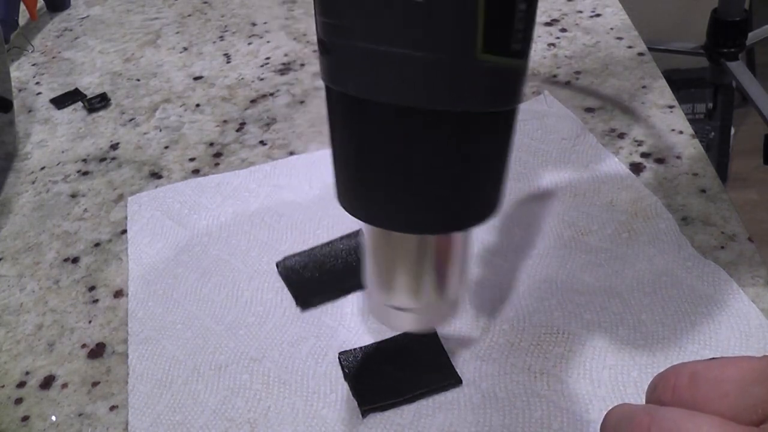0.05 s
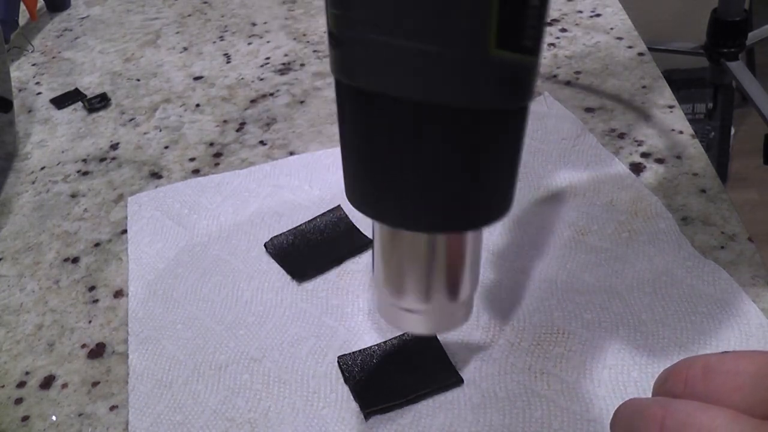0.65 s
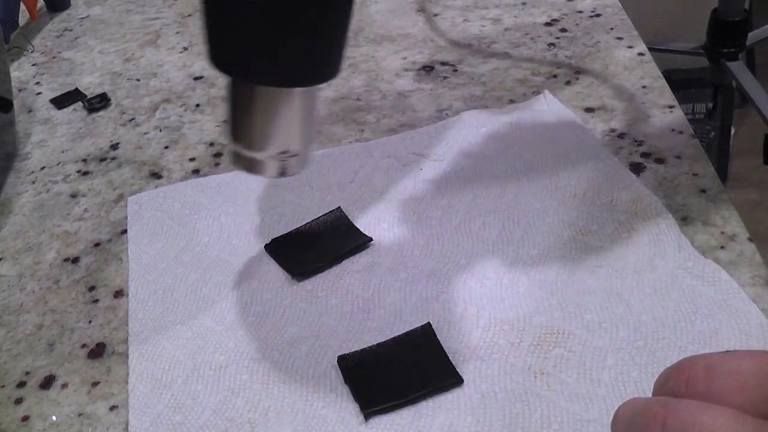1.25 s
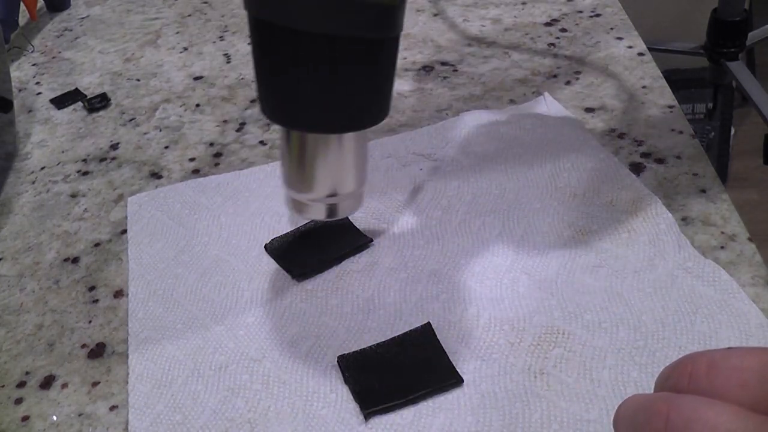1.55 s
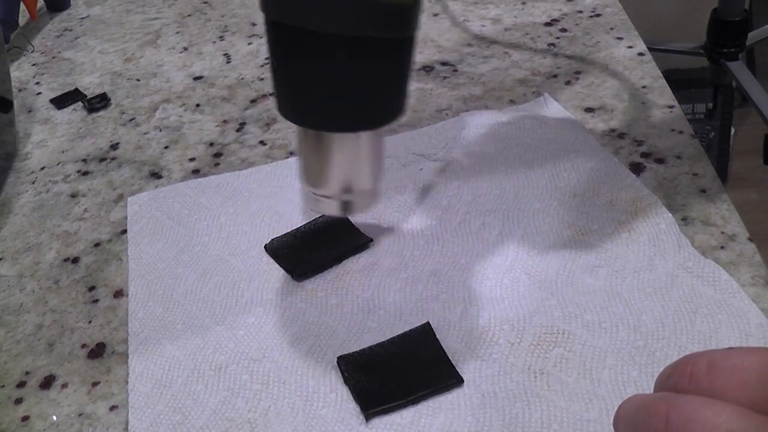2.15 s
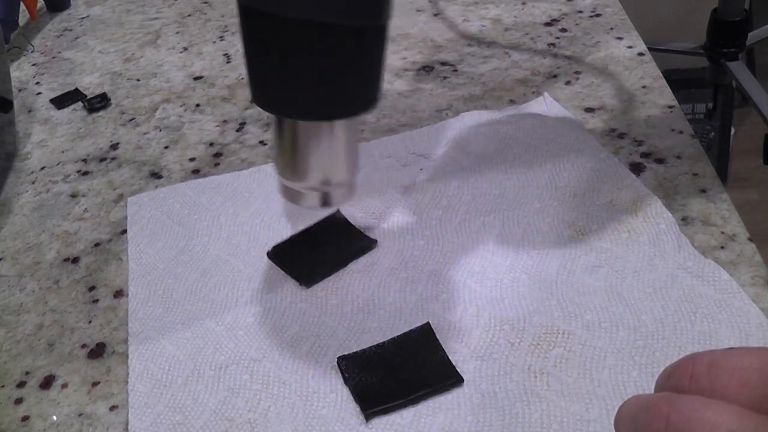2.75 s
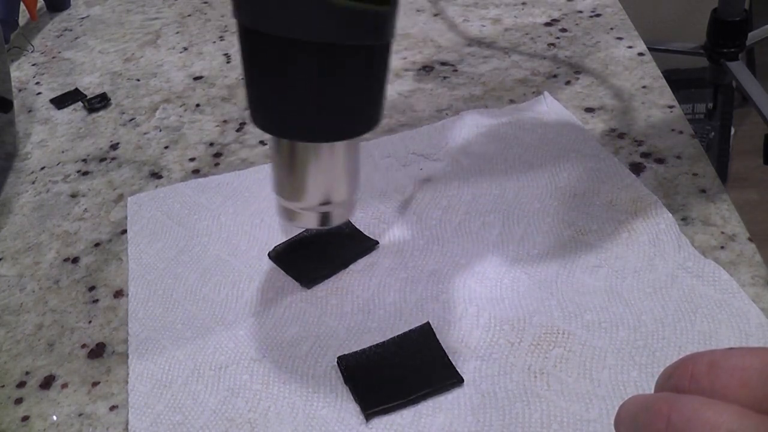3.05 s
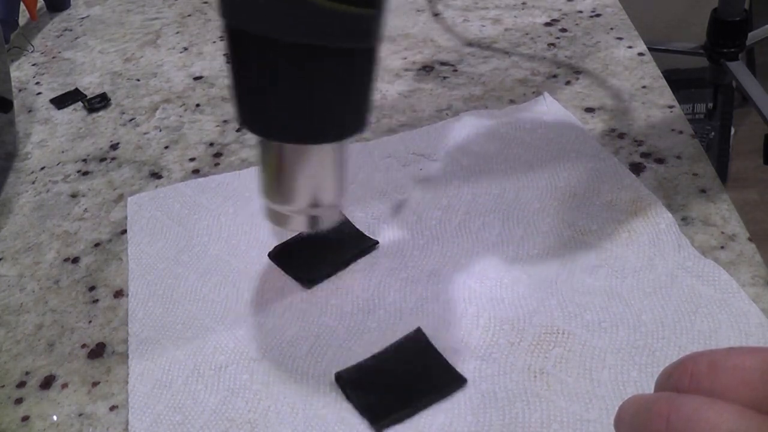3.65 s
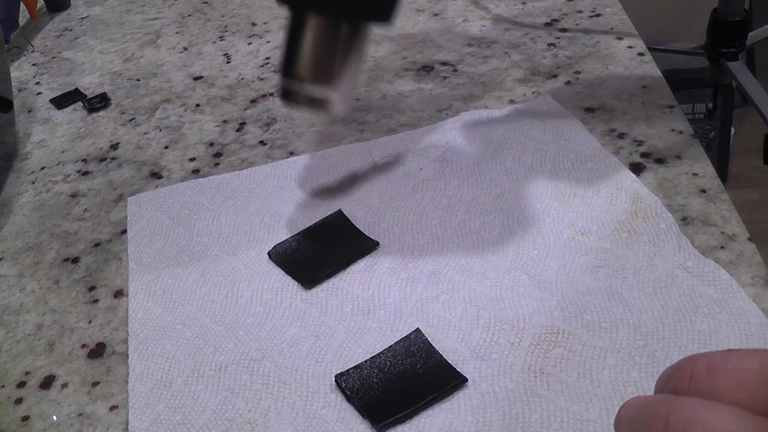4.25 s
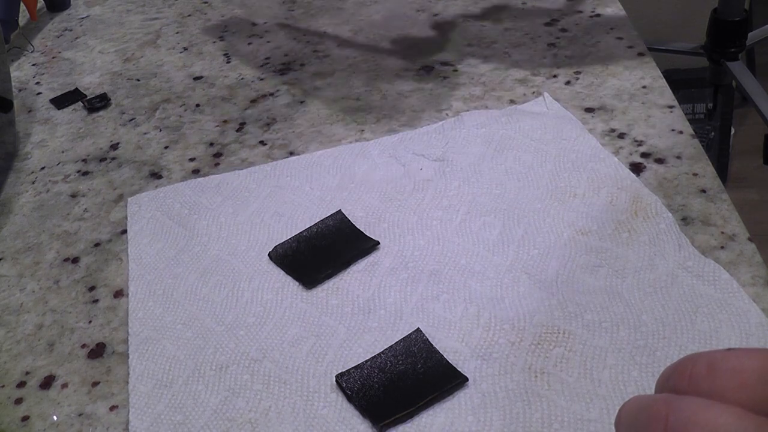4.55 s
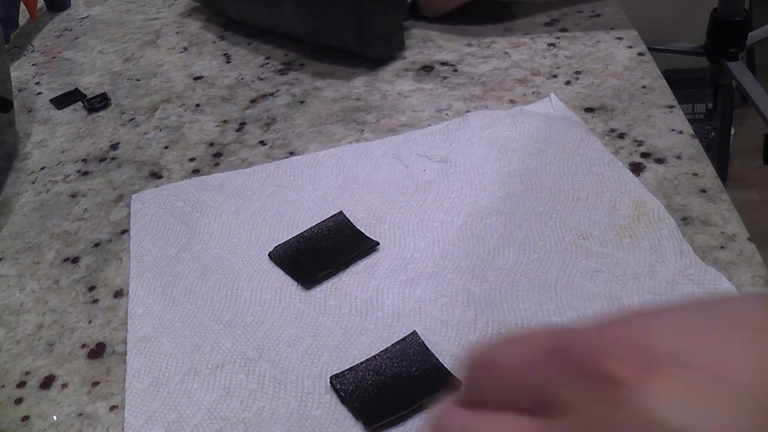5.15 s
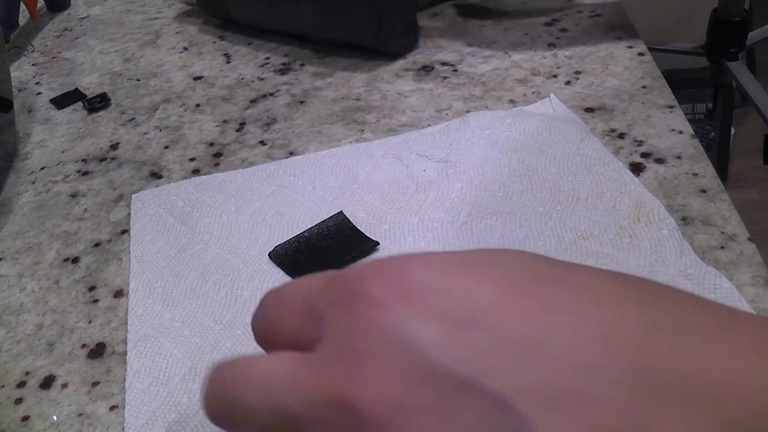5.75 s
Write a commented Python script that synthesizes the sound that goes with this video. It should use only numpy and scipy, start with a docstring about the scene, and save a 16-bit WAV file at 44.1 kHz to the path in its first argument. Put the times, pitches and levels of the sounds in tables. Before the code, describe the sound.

Steady rushing air and motor whine from a heat gun, then a switch click, a slowing fan and a knock as it is set down.

```python
"""A heat gun blows over scraps on a stone kitchen counter: its turbulent jet rings in the barrel and
the gap below, howls on dips and hisses on paper, over the hum and whine of the motor.
The switch snaps off; the fan coasts down with brush chatter and a sinking commutator whistle.
The gun lands on the counter, judders and tips onto its side.
Fingers then pick a scrap off a paper towel. The handling sounds echo in the quiet kitchen."""
import sys
import numpy as np
from scipy import signal
from scipy.fft import rfft, irfft
from scipy.io import wavfile

SR = 44100
rng = np.random.default_rng(int(sys.argv[2]) if len(sys.argv) > 2 else 0)


def inscribe(sig):
    """Save sig as 16-bit PCM at rate SR to the path in sys.argv[1].

    A 1-D sig is mono; a 2-D sig holds one channel per row.
    Samples are clipped to [-1, 1] before scaling.
    """
    pcm = np.round(np.clip(np.atleast_2d(sig).T, -1, 1) * 32767)
    wavfile.write(sys.argv[1], SR, pcm.astype(np.int16))


N = 264600
TIME_S = np.arange(N) / SR
BINS_HZ = np.maximum(np.arange(N // 2 + 1) * SR / N, 1)
RUN_RPS, POWER_OFF_S = 255.7, 4.11

# Room noise and hiss. Each row: frequency in Hz, relative density in dB.
FLOOR_SPECTRUM = [(30, -30), (70, -26), (120, -11), (190, 3.5), (450, 0), (800, -2.5), (1300, 1),
                  (3000, -8), (8000, -9), (16000, -9)]
# Kitchen reverb colour. Each row: frequency in Hz, gain in dB.
ROOM_GAINS = [(100, 13.5), (300, -4.5), (900, -8), (2000, -1.5), (5000, -9), (12000, -9)]
# Kitchen reverb decay. Each row: frequency in Hz, T60 in seconds.
ROOM_DECAY = [(150, 0.33), (2000, 0.36), (6000, 0.4), (14000, 0.33)]

# Fingers sliding on the towel. Each row: time in seconds, level in dB.
SLIDE_LEVELS = [(5.6, -59), (5.62, -43), (5.64, -44), (5.665, -48), (5.7, -70), (5.78, -84)]
# Fingernail on paper. Each row: start in seconds, force in dB.
NAIL_HITS = [(5.6072, -29), (5.624, -35), (5.6445, -34), (5.6595, -21.5), (5.663, -18.5)]
# Paper towel modes. Each row: frequency in Hz, gain in dB, T60 in seconds.
PAPER_MODES = [(3600, -5, 0.0029), (4500, -5, 0.0027), (5850, -5.5, 0.0058), (7140, -8, 0.0033),
               (8500, -5.5, 0.0027), (10900, -27, 0.0017)]
# Scrap tapping the counter. Each row: start in seconds, force in dB.
SCRAP_HITS = [(5.6812, -44), (5.6895, -22), (5.7425, -43), (5.7555, -48)]
# Scrap modes. Each row: frequency in Hz, gain in dB, T60 in seconds.
SCRAP_MODES = [(815, -10.5, 0.029), (1250, -12, 0.004), (3520, -1, 0.0023), (4550, -5.5, 0.011)]

# Gun foot landing, heel then sole. Each row: start in seconds, force in dB.
FOOT_HITS = [(4.9963, -8), (4.9978, -17)]
# Foot modes. Each row: frequency in Hz, gain in dB, T60 in seconds.
FOOT_MODES = [(1210, -34, 0.0062), (2140, -5.5, 0.0081), (2490, -34, 0.22), (2510, -5.5, 0.01),
              (4330, -8.5, 0.017), (5040, -4, 0.0095), (7150, -6, 0.0055), (8300, -9.5, .005),
              (10200, -6.5, 0.003), (12100, -11, 0.0025)]
# Barrel tipping onto stone, rim then flank. Each row: start in seconds, force in dB.
BARREL_HITS = [(5.3035, -23), (5.3055, -11.5)]
# Struck barrel modes. Each row: frequency in Hz, gain in dB, T60 in seconds.
BARREL_MODES = [(1010, -6.5, 0.022), (1690, -7.5, 0.035), (1800, -10.5, 0.024), (2045, -7, 0.017),
                (2780, -13.5, 0.02), (4380, -9, 0.0028), (6900, -24, 0.0055)]
# Gun rocking on the counter. Each row: start in seconds, force in dB, first gap in seconds,
# ratio of successive gaps, loss per touch in dB.
ROCKING_RUNS = [(4.998, -21.5, 0.036, .8, 8.5), (5.105, -30, .033, .9, 6), (5.323, -21.5, .013, .95, 13)]
# Counter modes. Each row: frequency in Hz, gain in dB, T60 in seconds.
COUNTER_MODES = [(119.3, -35, 0.087), (185, -12, 0.031), (243, -12, 0.053), (320, -3.5, 0.028),
                 (494, -3.5, 0.022), (805, -23, 0.042)]
# Switch snap. Each row: start in seconds, force in dB.
SWITCH_HITS = [(4.1168, -15), (4.1185, -11)]
# Switch modes. Each row: frequency in Hz, gain in dB, T60 in seconds.
SWITCH_MODES = [(1250, -12, .02), (3050, -5, .012), (3700, -5, .011), (4300, -6, .009), (5900, -11, .006),
                (7600, -12, .006), (10600, -9, .006), (12800, -19, .005)]

# Speeds that shake the housing. Each row: centre and width in turns per second, boost in dB.
SHAKE_SPEEDS = [(207, 36, 9.5), (162.8, 12.4, 9.5)]
# Housing response to brush ticks. Each row: frequency in Hz, relative gain in dB.
HOUSING_SPECTRUM = [(150, -38), (1000, -22), (2200, 1), (3100, -2.5), (4300, 3), (6000, 6.5), (7000, -1.5),
                    (9500, -0.5), (10800, -10), (13500, -7), (15000, -2), (16000, -14)]
# Sharp housing resonances. Each row: frequency in Hz, width in Hz, gain in dB.
HOUSING_PEAKS = [(2750, 150, -5), (3550, 400, 1), (5620, 350, 4), (6400, 300, 1), (7550, 200, 0),
                 (8680, 300, -1), (9400, 200, -5), (14900, 600, -7)]
# Fan swirl at full speed. Each row: frequency in Hz, relative density in dB.
FAN_SPECTRUM = [(100, -45), (250, -10.5), (500, -11.5), (750, -4), (1020, 5), (1300, -0.5), (1900, -5.5),
                (2550, 2), (3200, -22), (8000, -42)]
# Vents swinging past. Each row: middle in seconds, length in seconds, added swirl in relative dB.
VENT_PASSES = [(4.27, 0.086, 3.5)]
# Motor tones. Each row: multiple of the turn rate, base levels in dB over the near and far scrap.
MOTOR_TONES = [(1, -56.5, -59), (2, -62, -63), (3, -51, -53), (6, -48, -53), (10, -52, -52), (12, -45, -53),
               (13, -55, -68), (14, -57, -56), (16, -56, -49), (17, -57, -51), (18, -60, -44),
               (19, -60, -60), (20, -57, -54), (21, -53, -54), (22, -59, -59), (25, -66, -65),
               (30, -61, -63), (32, -65, -65), (35, -62, -61), (36, -53, -58.5), (37, -61, -66),
               (38, -72, -68), (40, -61, -74), (45, -69, -76), (51, -74, -72), (53, -67, -82),
               (55, -74, -74), (57, -60, -61), (59, -70, -70), (60, -59, -55), (61, -62, -70)]

# Nozzle aim. Each row: time in seconds, position from 0 (near scrap) to 1 (far scrap).
AIM_PATH = [(0, 0), (1.0, 0), (1.28, .25), (1.42, 1), (3.5, 1), (3.8, .8), (4.05, 1), (4.3, .7)]
# Jet turbulence. Each row: frequency in Hz, relative density in dB.
JET_SPECTRUM = [(40, -73), (90, -40), (170, -40), (280, -21.5), (600, -10), (900, -10), (1500, -8),
                (3300, -12.5), (5000, -20), (7500, -25), (10000, -34), (14000, -38), (16000, -38)]
# Barrel and gap resonances, near scrap. Each row: frequency in Hz, width in Hz, gain in dB.
NEAR_GAP_PEAKS = [(1182, 380, 15), (1500, 350, -4), (1903, 330, 6), (2320, 100, -28), (2950, 580, 4.5),
                  (3370, 490, -2.5), (4030, 510, 10), (5240, 370, -16), (6070, 270, 0), (7420, 160, 6.5),
                  (7940, 430, -25)]
# Barrel and gap resonances, far scrap. Each row: frequency in Hz, width in Hz, gain in dB.
FAR_GAP_PEAKS = [(1067, 200, 9.5), (1266, 226, 17.5), (1660, 300, 1.5), (2300, 110, 2.5),
                 (3066, 130, -12.5), (3710, 340, 4), (4433, 510, 12), (4970, 210, -12), (5710, 930, 6),
                 (7140, 320, -8), (7480, 580, 6.5)]
# Nozzle dipping onto a scrap. Each row: middle in seconds, length in seconds, howl gain in dB.
NOZZLE_DIPS = [(.47, 1.21, -31), (1.67, 0.2, -33), (2.14, 0.24, -32), (2.58, 0.6, -39), (3.22, 0.29, -33.5),
               (3.78, 0.29, -32.5)]
# Howl overtones in the barrel. Each row: frequency in Hz, width in Hz, gain in dB.
HOWL_PEAKS = [(1762, 580, 27), (2737, 910, 27)]
# Jet crossing bare paper. Each row: middle in seconds, length in seconds, hiss gain in dB.
PAPER_SWEEPS = [(.35, .9, -45), (1.23, 0.21, -39), (4.15, 0.21, -41)]
# Jet hiss on paper. Each row: frequency in Hz, relative density in dB.
HISS_SPECTRUM = [(2000, -42), (4500, -1.5), (6000, 9.5), (7000, -5), (8500, -1.5), (11000, -12),
                 (16000, -11)]


def from_db(db):
    """Decibels to gain."""
    return 10 ** (np.asarray(db) / 20)


def unit_rms(x):
    """Scale to rms 1."""
    return x / np.sqrt(np.mean(x ** 2) + 1e-20)


def at_samples(rows):
    """Control curve at every sample."""
    return np.interp(TIME_S, *np.transpose(rows))


def at_hz(rows, hz):
    """Interpolate on a log-frequency axis."""
    row_hz, values = np.transpose(rows)
    return np.interp(np.log(hz), np.log(row_hz), values)


def bell(x, centre, width):
    """Gaussian of height 1; full width at half height."""
    return .5 ** ((2 * (x - centre) / width) ** 2)


def drift(rate_hz, hop=40, settle=2000):
    """Smooth random curve, rms about 1."""
    pole = np.exp(-2 * np.pi * hop * rate_hz / SR)
    noise = rng.standard_normal(N // hop + settle + 2)
    slow = signal.lfilter([1], [1, -2 * pole, pole * pole], noise)[settle:]
    return np.interp(np.arange(N) / hop, np.arange(len(slow)), unit_rms(slow))


def ramp(start_s, length_s):
    """Linear rise from 0 to 1."""
    return np.clip((TIME_S - start_s) / length_s, 0, 1)


def swells(rows, edge_s):
    """Gain of soft-edged passes."""
    return sum(from_db(db) * .5 * (1 + np.tanh((length_s / 2 - np.abs(TIME_S - middle_s)) / (2 * edge_s)))
               for middle_s, length_s, db in rows)


def colour(x, spectrum, peaks=()):
    """Filter by a broad spectrum plus peaks and notches; rms 1."""
    db = at_hz(spectrum, BINS_HZ)
    for hz, width_hz, gain_db in peaks:
        db = db + gain_db * bell(BINS_HZ, hz, width_hz)
    return unit_rms(irfft(rfft(x) * from_db(db), N))


def shaped_noise(spectrum, peaks=()):
    """Coloured noise, rms 1."""
    return colour(rng.standard_normal(N), spectrum, peaks)


def ring(force, modes):
    """Damped modes of alternating sign; slow pushes radiate nothing."""
    out = 0
    for k, (hz, db, t60_s) in enumerate(modes):
        radius = from_db(-60 / (t60_s * SR))
        poles = [1, -2 * radius * np.cos(2 * np.pi * hz / SR), radius * radius]
        out += (-1) ** k * from_db(db) * signal.lfilter([.5, 0, -.5], poles, force + 1e-18)
    return out


def strike(hits, modes, crunch, crunch_s):
    """Each hit, a click plus decaying micro-contacts, rings the modes."""
    force, age_s = np.zeros(N), TIME_S[:SR // 20]
    for start_s, db in hits:
        contact = crunch * rng.standard_normal(len(age_s)) * np.exp(-age_s / crunch_s)
        contact[0] = 1
        at = round(start_s * SR)
        force[at:at + len(age_s)] += from_db(db) * contact
    return ring(force, modes)


def bounces(start_s, db, gap_s, ratio, loss_db):
    """Four hits of a settling object, ever weaker and quicker."""
    return [(start_s + gap_s * sum(ratio ** j for j in range(k)), db - loss_db * k) for k in range(4)]


def background(floor_db=-53, tone_db=-68.5, tone_hz=12023):
    """Room noise, hiss and a thin electronic tone."""
    tone = np.sqrt(2) * from_db(tone_db) * np.sin(2 * np.pi * tone_hz * TIME_S)
    return from_db(floor_db) * shaped_noise(FLOOR_SPECTRUM) + tone


def kitchen_reverb(x, predelay_s=.006, bands=9):
    """Diffuse reflections, one decay time per band."""
    age_s, response = TIME_S[:SR // 2], 0
    edges_hz = np.geomspace(70, 17000, bands + 1)
    for low_hz, high_hz in zip(edges_hz, edges_hz[1:]):
        hz = np.sqrt(low_hz * high_hz)
        decay = from_db(-60 * age_s / at_hz(ROOM_DECAY, hz)) * (age_s > predelay_s)
        echoes = rng.standard_normal(len(age_s)) * decay / np.linalg.norm(decay)
        band = signal.butter(2, [low_hz, high_hz], "band", fs=SR, output="sos")
        response += from_db(at_hz(ROOM_GAINS, hz)) * signal.sosfilt(band, echoes)
    return signal.fftconvolve(x, response)[:N]


def fingers(snags_per_s=5000):
    """A nail ticks on paper, the scrap taps, fibres snag and release."""
    nail = strike(NAIL_HITS, PAPER_MODES, crunch=.18, crunch_s=.0016)
    scrap = strike(SCRAP_HITS, SCRAP_MODES, crunch=.12, crunch_s=.001)
    snags = rng.standard_normal(N) * (rng.random(N) < snags_per_s / SR)
    rustle = from_db(at_samples(SLIDE_LEVELS)) * unit_rms(ring(snags, PAPER_MODES))
    return nail + scrap + rustle


def set_down():
    """The foot lands, the barrel tips over, the counter thuds under the rocking weight."""
    judder = bounces(start_s=5.0795, db=-24, gap_s=.03, ratio=.67, loss_db=1.8)
    rebound = bounces(start_s=5.3165, db=-22.5, gap_s=.0135, ratio=.5, loss_db=9)
    rocking = [hit for run in ROCKING_RUNS for hit in bounces(*run)]
    foot = strike(FOOT_HITS + judder, FOOT_MODES, crunch=.077, crunch_s=.0017)
    barrel = strike(BARREL_HITS + rebound, BARREL_MODES, crunch=.082, crunch_s=.0028)
    counter = strike(rocking, COUNTER_MODES, crunch=.056, crunch_s=.008)
    return foot + barrel + counter


def switch():
    """The switch snaps off and rings briefly."""
    return strike(SWITCH_HITS, SWITCH_MODES, crunch=.1, crunch_s=.0011)


def lifted():
    """0 to 1 as the gun lifts off the work."""
    return ramp(start_s=4.08, length_s=.09)


def aside():
    """0 to 1 as the gun swings aside."""
    return ramp(start_s=4.47, length_s=.077)


def coasting():
    """0 under power, 1 once the rotor runs free."""
    return ramp(POWER_OFF_S, length_s=.083)


def rotor_rps(sag_rps_per_s=.27, friction_rps_per_s=76, drag_per_turn=.0042):
    """Speed sags under power, then bearing friction and air drag brake it."""
    powered_rps = RUN_RPS - sag_rps_per_s * np.minimum(TIME_S, POWER_OFF_S)
    off_s = np.maximum(TIME_S - POWER_OFF_S, 0)
    knee_rps = np.sqrt(friction_rps_per_s / drag_per_turn)  # drag equals friction here
    rps = knee_rps * np.tan(np.arctan(powered_rps / knee_rps) - drag_per_turn * knee_rps * off_s)
    return np.maximum(rps, 1)


def shake_db(rps):
    """Boost at speeds where the rotor shakes the housing."""
    return sum(db * bell(rps, centre_rps, width_rps) for centre_rps, width_rps, db in SHAKE_SPEEDS)


def commutator(rps, turns, segments=5, overtones=20, base_db=-51.5, aside_db=-4, rough_db=5.5):
    """Coasting whistle: overtones of the segment rate chirp through housing resonances."""
    grid_hz, whistle = np.arange(0, SR // 2, 10), 0
    response = np.sqrt(sum(from_db(db) ** 2 / (1 + (2 * (grid_hz - hz) / width_hz) ** 2) ** 2
                           for hz, width_hz, db in HOUSING_PEAKS))
    for k in segments * np.arange(1, overtones + 1):
        gain = np.interp(k * rps, grid_hz, response, right=0) * from_db(rough_db * drift(40))
        whistle += gain * np.sin(2 * np.pi * (k * turns + rng.random()))
    db = base_db + aside_db * aside() + shake_db(rps)
    return coasting() * from_db(db) * (rps / RUN_RPS) ** .95 * whistle


def brushes(rps, turns, spots=30, jitter_turns=.0018, base_db=-53, coast_db=8, aside_db=-2):
    """The same rough spots tick past the brushes each turn; the housing radiates them."""
    spot_turns, sizes = rng.random(spots), rng.standard_normal(spots)
    tick_turns = np.arange(int(turns[-1]))[:, None] + spot_turns
    tick_turns += jitter_turns * rng.standard_normal(tick_turns.shape)
    at = np.interp(tick_turns, turns, np.arange(N)).ravel()
    force = (sizes * (1 + .35 * rng.standard_normal(tick_turns.shape))).ravel()
    whole, part = at.astype(int), at % 1  # split each tick over two samples
    ticks = np.bincount(whole, force * (1 - part), N + 1) + np.bincount(whole + 1, force * part, N + 1)
    db = base_db + coast_db * coasting() + aside_db * aside() + .41 * shake_db(rps)
    return from_db(db) * (rps / RUN_RPS) ** .38 * colour(ticks[:N], HOUSING_SPECTRUM)


def fan(rps, turns, base_db=-45, lifted_db=5, aside_db=-6.5):
    """Blade eddies sink in pitch and level with the speed."""
    eddies = np.interp(turns / RUN_RPS, TIME_S, shaped_noise(FAN_SPECTRUM))
    db = base_db + lifted_db * lifted() + aside_db * aside()
    vent_gain = 1 + swells(VENT_PASSES, edge_s=.022)
    return from_db(db) * vent_gain * (rps / RUN_RPS) ** 1.84 * eddies


def motor_whine(turns, trim_db=.62, waver_db=3, whine_release_s=.021, hum_release_s=.26):
    """Turn-rate harmonics waver as the gun moves; they die with the current, the rotor hum later."""
    off_s = np.maximum(TIME_S - POWER_OFF_S, 0)
    far, out = at_samples(AIM_PATH), 0
    for k, near_db, far_db in MOTOR_TONES:
        depth, release_s = (1, hum_release_s) if k == 1 else ((k / 20) ** .25, whine_release_s)
        db = trim_db + near_db + (far_db - near_db) * far + depth * waver_db * drift(6.3)
        amplitude = np.sqrt(2) * from_db(db) * np.exp(-off_s / release_s)
        out += amplitude * np.sin(2 * np.pi * (k * turns + rng.random()))
    return out


def stone_echo(x, mean_lag_s=.001066, sway=.073, gain=.3):
    """Reflection off the counter; the waving hand shifts its delay."""
    lag_s = mean_lag_s * (1 + sway * drift(4))
    return gain * np.interp(TIME_S - lag_s, TIME_S, x)


def air_jet(rps, base_db=-26.3, far_db=-.38, lifted_db=-6, aside_db=-7.5,
            hover_howl_db=-40, dip_rush_db=-11, dip_hiss_db=-20.5, flutter_db=.55):
    """Turbulence follows fan speed and rings in barrel and gap; dips add howl, rush and hiss."""
    far, dips = at_samples(AIM_PATH), swells(NOZZLE_DIPS, edge_s=.035)
    rush_gain = from_db(base_db + far_db * far + lifted_db * lifted()) + from_db(dip_rush_db) * dips
    howl_gain = np.hypot(from_db(hover_howl_db), dips)
    hiss_gain = swells(PAPER_SWEEPS, edge_s=.02) + from_db(dip_hiss_db) * dips
    near_rush = np.sqrt(1 - far) * shaped_noise(JET_SPECTRUM, NEAR_GAP_PEAKS)
    far_rush = np.sqrt(far) * shaped_noise(JET_SPECTRUM, FAR_GAP_PEAKS)
    howl = howl_gain * shaped_noise(JET_SPECTRUM, HOWL_PEAKS)
    hiss = hiss_gain * shaped_noise(HISS_SPECTRUM)
    direct = rush_gain * (near_rush + far_rush) + howl + hiss
    flow_gain = (rps / RUN_RPS) ** 2.26 * from_db(aside_db * aside())
    return flow_gain * (direct + stone_echo(direct)) * from_db(flutter_db * drift(22))


def scene(wobble=.0003):
    """One rotor speed drives motor, fan and jet; only handling feeds the reverb."""
    rps = rotor_rps() * (1 + wobble * drift(6.5))
    turns = np.cumsum(rps) / SR
    motor = motor_whine(turns) + brushes(rps, turns) + commutator(rps, turns) + fan(rps, turns)
    handling = switch() + set_down() + fingers()
    return (air_jet(rps) + motor + handling + kitchen_reverb(handling) + background())[None]


def record(dry, fade_in_s=.004, low_cut_hz=50, high_cut_hz=15900):
    """Soft start, thinned deep bass, steep top cut."""
    highpass = signal.butter(2, low_cut_hz, "high", fs=SR, output="sos")
    lowpass = signal.ellip(12, .1, 80, high_cut_hz, fs=SR, output="sos")
    thinned = signal.sosfilt(highpass, dry * ramp(0, fade_in_s))
    return signal.sosfilt(lowpass, thinned)


dry = scene()
out = record(dry)
inscribe(out)
```